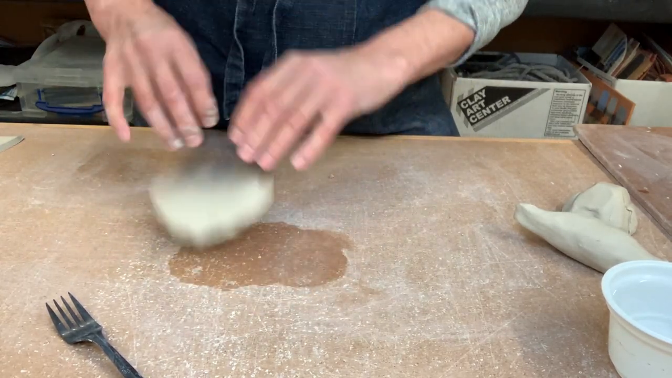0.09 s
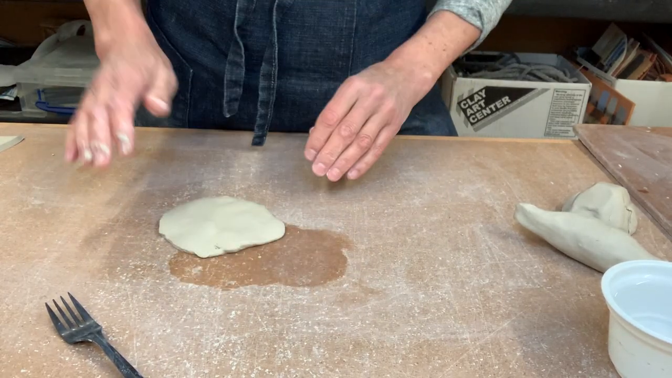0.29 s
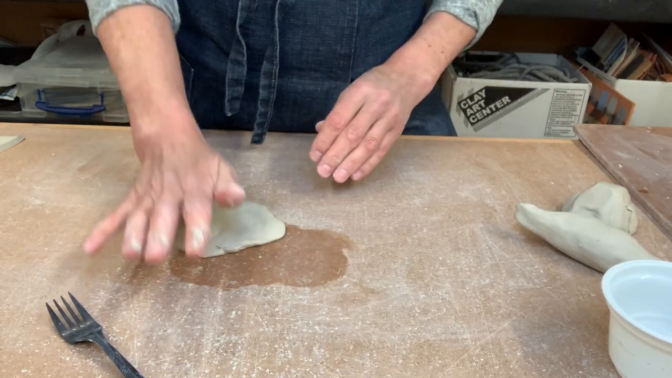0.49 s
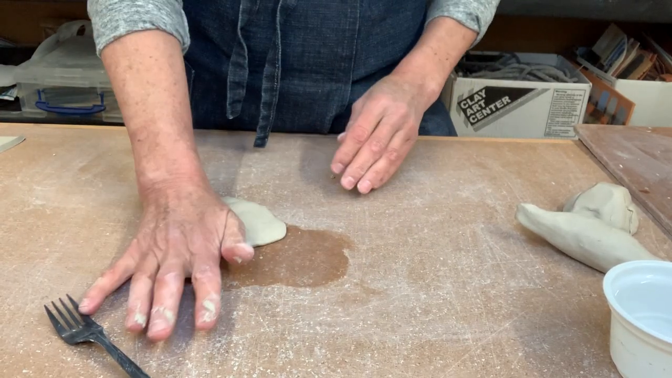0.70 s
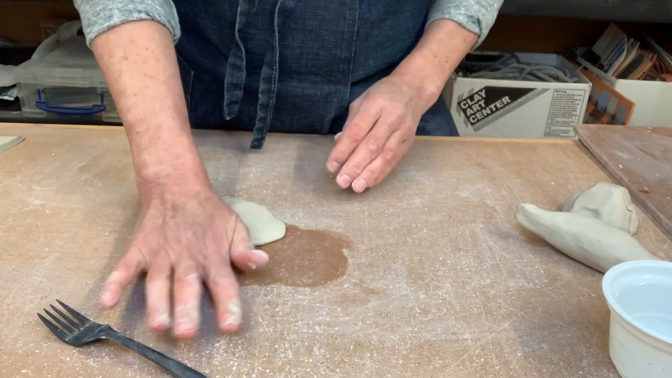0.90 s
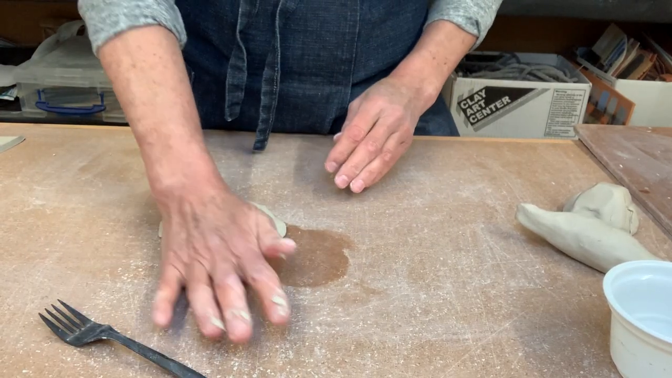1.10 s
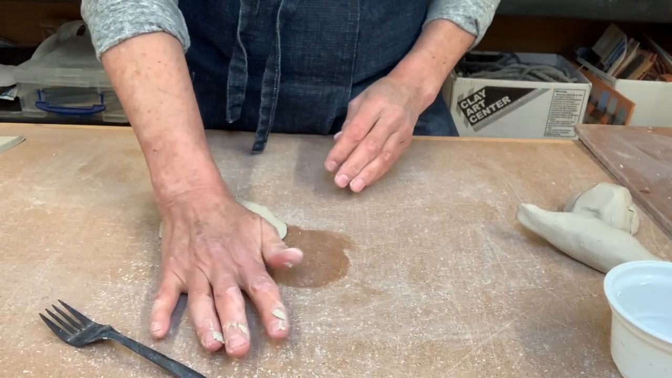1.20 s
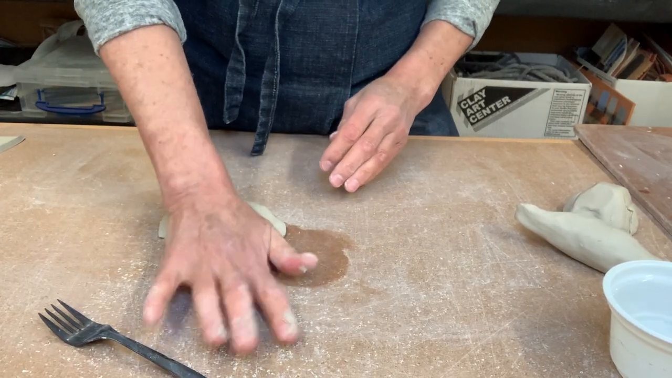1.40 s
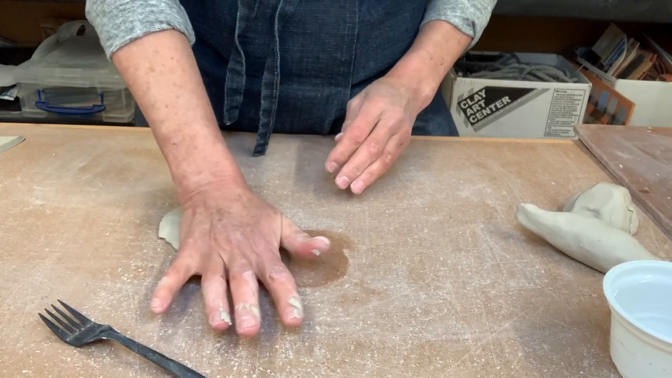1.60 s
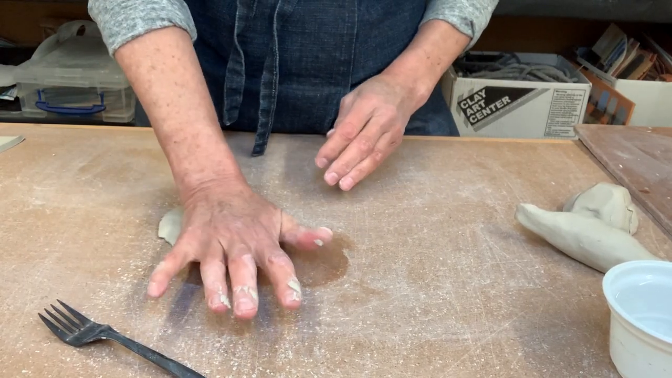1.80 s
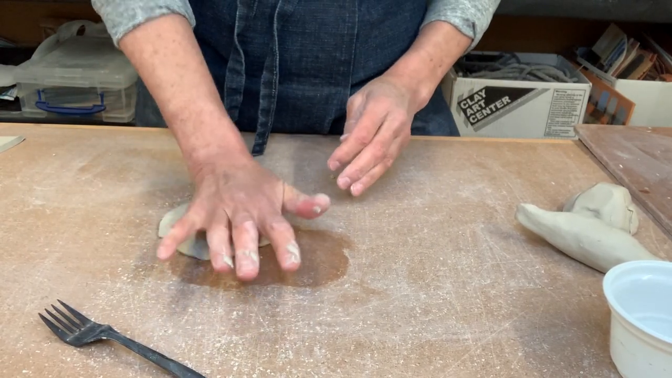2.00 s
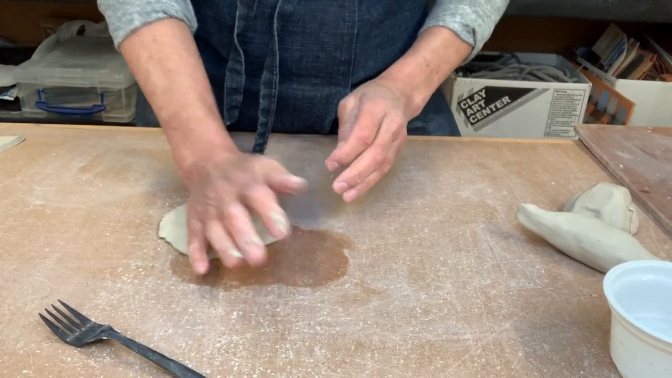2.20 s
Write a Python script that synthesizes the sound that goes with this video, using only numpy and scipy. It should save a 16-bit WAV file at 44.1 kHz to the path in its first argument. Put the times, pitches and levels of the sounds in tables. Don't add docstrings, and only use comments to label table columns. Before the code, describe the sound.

A bare palm slaps moist clay on a wooden table, then sticky skin peels off with ticks

```python
import sys
import numpy as np
from scipy import signal
from scipy.fft import rfft, irfft, next_fast_len
from scipy.io import wavfile
from scipy.ndimage import uniform_filter1d

SR = 44100
rng = np.random.default_rng(int(sys.argv[2]) if len(sys.argv) > 2 else 0)


def natural_amplitude(level_db):
    exponent = np.asarray(level_db, float) / 20
    return 10 ** exponent


def int16_out(signal):
    q = np.round(np.clip(np.atleast_2d(signal).T, -1, 1) * 32767)
    wavfile.write(sys.argv[1], SR, q.astype(np.int16))


N = 97020
M = next_fast_len(N + SR // 4)
F = np.arange(M // 2 + 1) * SR / M + 1e-9
T = np.arange(N) / SR
SLAP_S = 0.2052
NOTCH_HZ = 8490


def curve(points):
    p = np.array(points, float)
    return np.interp(np.log(F), np.log(np.maximum(p[:, 0], 1)), p[:, 1])


def shape(x, response):
    return irfft(rfft(x, M) * response, M)[..., :N]


def above(hz):
    return (1j * F / (1j * F + hz)) ** 2


def delay(seconds):
    return np.exp(-2j * np.pi * F * seconds)


def decay(t, t60):
    return np.exp(-np.log(1000) * t / t60)


def unit(x):
    return x / np.sqrt(np.mean(x ** 2))


def bump(at, rise, fall):
    return np.exp(np.where(T < at, (T - at) / rise, (at - T) / fall))


def walk(rate):
    k = int(SR / rate)
    return unit(uniform_filter1d(uniform_filter1d(rng.standard_normal(N), k), k))


def ring(tones_hz, modes, at, scatter_db, count):
    out = np.zeros(N + count)
    start = int(at * SR)
    luck = rng.standard_normal(len(modes))
    t = np.maximum((np.arange(count) + start) / SR - at, 0)
    for hz, (db, t60), a in zip(tones_hz, modes, luck):
        out[start:start + count] += natural_amplitude(db + scatter_db * a) * decay(t, t60) * np.sin(2 * np.pi * hz * t)
    return out[:N]


# f/Hz, level/dB
HUM_TONE = [(25, -13.5), (50, 1), (115, 0), (165, -14), (300, -14), (450, -28.5), (4000, -42), (14000, -45)]
# f/Hz, level/dB
DRONES = [(120, -80.5), (417, -89)]
HUM_DB = -64.5


def hum():
    noise = shape(rng.standard_normal((2, N)), natural_amplitude(curve(HUM_TONE)))
    low = 1 / (1 + (F / 400) ** 2)
    rumble = shape(noise[0], low) * natural_amplitude(0.83 * walk(6.3))
    hiss = shape(noise[0], 1 - low) * natural_amplitude(0.84 * walk(11))
    side = shape(noise[1], np.clip(F / 500, 0.1, 1))
    drones = sum(natural_amplitude(db + 2 * walk(6)) * np.sin(2 * np.pi * hz * T + 1.7 * walk(3.6)) for hz, db in DRONES)
    return natural_amplitude(HUM_DB) * unit(rumble + hiss + side * np.array([[1], [-1]])) + drones


# f/Hz, t60/s, late level/dB
ROOM_BANDS = [(245, 0.16, -2.5), (520, 0.2, -14), (1000, 0.25, -7), (2000, 0.26, 0.53), (4170, 0.33, 1),
              (7987, 0.25, -9), (14000, 0.21, -12)]
# f/Hz, level/dB
ROOM_TINT = [(200, -1.5), (500, -0.5), (1000, -1), (1800, -3), (2500, 0.6), (3400, -3), (5000, -4),
             (12000, -7.5)]
ROOM_DB, LATE_DB, LATE_T60_S, ROOM_GAP_S = -10, -36, 1, 0.0019


def room():
    out = 0
    for hz, t60, late_db in ROOM_BANDS:
        band = shape(rng.standard_normal((2, N)), np.exp(-(np.log2(F / hz) / 0.62) ** 2))
        late = natural_amplitude(LATE_DB + late_db - ROOM_DB) * decay(T, LATE_T60_S)
        out = out + band * (decay(T, t60) + late)
    out = out * np.clip(T / ROOM_GAP_S - 1, 0, 1)
    return natural_amplitude(ROOM_DB + curve(ROOM_TINT)) * rfft(out / np.sqrt(np.sum(out ** 2) / 2), M)


# t/s, level/dB, rise/s, fall/s, tilt/(dB per
PATS = [(.795, -64, .004, 0.035, -0.5), (0.899, -80.5, 0.08, 0.017, -4), (1.23, -74, .02, 0.026, -0.5),
        (1.29, -74.5, 0.026, 0.041, -1), (1.476, -60.5, 0.012, 0.0077, 1.4), (1.515, -76, 0.022, 0.022, -3),
        (1.657, -66, .002, .004, -0.6), (1.659, -62, 0.0019, 0.009, -9),
        (1.927, -61.5, 0.0136, 0.009, -0.4), (2.06, -80, 0.031, 0.034, 0),
        (2.1105, -41, 0.0006, 0.002, -4.5), (2.116, -59, .005, 0.017, -4.5), (2.2, -57, 0.0026, .004, -6)]
# f/Hz, level/dB
PAT_TONE = [(160, -16), (450, -4.5), (1970, -9), (3580, -13), (6410, -15), (13800, -26.5), (16000, -46)]


def pats():
    out = 0
    octaves = np.log2(np.maximum(F, 500) / 2000)
    for at, db, rise, fall, tilt_db in PATS:
        grit = rng.standard_normal(N) * natural_amplitude(2.3 * walk(600))
        brush = unit(shape(grit, natural_amplitude(curve(PAT_TONE) + tilt_db * octaves)))
        out = out + natural_amplitude(db) * bump(at, rise, fall) * brush
    return out


# f/Hz, level/dB
PEEL_TONE = [(400, 6), (1300, 18), (3300, 8.5), (4600, -13), (5500, 13), (7000, -1), (10600, -7),
             (15000, -12)]
PEEL_FROM_S, PEEL_TO_S, PEEL_RISE_S, PEEL_FADE_S = 0.925, 1.039, 0.0094, 0.013
PEEL_DB, GRAINS_PER_S = -57, 6000


def crackle():
    chance, size = rng.random((2, N))
    grains = (chance < GRAINS_PER_S / SR) * natural_amplitude(-1.5 * np.log(size + 1e-9)) * rng.standard_normal(N)
    rise = np.clip((T - PEEL_FROM_S) / PEEL_RISE_S, 0, 1)
    fade = np.exp(-np.maximum(T - PEEL_TO_S, 0) / PEEL_FADE_S)
    return natural_amplitude(PEEL_DB) * rise * fade * unit(shape(grains, natural_amplitude(curve(PEEL_TONE))))


# t/s, level/dB, treble level/dB, pitch ratio
TICKS = [(.786, -41, -5, 1.03), (0.889, -61, -26, .95), (.915, -75, -26, 0.84), (.933, -50, -26, 0.87),
         (0.9406, -26.5, 0, 1.055), (0.958, -48, -14.5, 0.68), (.964, -56, -12, 0.99),
         (0.9965, -31, 3.5, 0.987), (1.027, -37.5, -12, .97), (1.045, -46, -16, 0.84),
         (1.057, -55, -21, 0.42)]
TICK_LOW_HZ = [1100, 1420, 2400, 3650, 5300, 1750, 3150, 6100]
# level/dB, t60/s
TICK_LOW = [(-9.5, 0.022), (-2.5, 0.011), (-14, 0.0061), (-4, 0.0089), (-8, 0.0058), (-5, 0.013),
            (0.7, 0.0066), (-11.5, 0.0039)]
TICK_HIGH_HZ = [7300, 10500, 13500, 9400, 14800]
# level/dB, t60/s
TICK_HIGH = [(-6, 0.0038), (6.5, 0.0029), (-8.5, 0.005), (-5, 0.0039), (-12.5, 0.0036)]
DULL_HZ, TICK_CUT_HZ = 2000, 610


def ticks():
    out = 0
    for at, db, treble_db, ratio in TICKS:
        modes = [(g + 0.3 * treble_db * (hz > DULL_HZ), t60) for hz, (g, t60) in zip(TICK_LOW_HZ, TICK_LOW)]
        bubbles = ring(np.multiply(TICK_LOW_HZ, ratio), modes, at, 1.0, count=900)
        skin = ring(TICK_HIGH_HZ, TICK_HIGH, at, 3.7, count=900)
        out = out + natural_amplitude(db) * (bubbles + natural_amplitude(treble_db) * skin)
    return shape(out, above(TICK_CUT_HZ))


# f/Hz, level/dB
SNAP_TONE = [(300, 8), (1300, 18), (2400, 12.5), (3400, 19.5), (6000, 2), (10500, 16.5), (15000, 9)]


def snaps():
    return sum(natural_amplitude(db) * delay(at) for at, db, *_ in TICKS) * natural_amplitude(curve(SNAP_TONE))


# t/s, level/dB, contact/s
PUSHES = [(.206, -18.5, 0.002), (0.263, -25, 0.0046), (0.291, -30, .004), (.365, -37.5, 0.0054),
          (0.419, -51, .012), (0.457, -50, 0.0039), (0.489, -52, 0.0049), (0.529, -53, .006),
          (.755, -47, 0.012), (0.942, -53, 0.00185), (1.211, -46, 0.008), (1.385, -54, 0.014),
          (1.481, -50.5, 0.0038), (1.66, -44, 0.008), (1.869, -51.5, 0.0061), (1.924, -56, 0.0035),
          (2.112, -42, 0.003)]
TABLE_HZ = [51, 58, 86, 96, 112, 128, 160, 190, 217, 255, 340]
# level/dB, t60/s
TABLE_MODES = [(-11, 0.39), (-3, 0.17), (-9.5, 0.34), (0.5, 0.17), (4, 0.077), (-3, 0.22), (0, 0.096),
               (-3, .1), (0.5, 0.17), (-2.5, 0.13), (-20.5, 0.15)]
# t/s, level/dB, contact/s
LEANS = [
    (1.213, -44, .014),
    (1.664, -39, .014),
    (2.116, -21, .014),
]
LEGS_HZ = [55, 61, 75]
# level/dB, t60/s
LEGS_MODES = [(-1.5, .38), (-5, .25), (-9, .1)]


def pushed(pushes, tones_hz, modes):
    force = sum(natural_amplitude(db) * np.sin(np.pi * np.clip((T - at) / contact, 0, 1)) / (contact * SR)
                for at, db, contact in pushes)
    return shape(force, rfft(ring(tones_hz, modes, 0, 0, count=20000), M))


def table():
    return pushed(PUSHES, TABLE_HZ, TABLE_MODES) + pushed(LEANS, LEGS_HZ, LEGS_MODES)


# f/Hz, level/dB
CLAP_TONE = [(200, 0), (600, 3), (2000, -3), (4000, -8), (7000, -10), (11000, -8.5), (15000, -12.5)]
CLAP_DB = 24


def clap():
    return natural_amplitude(CLAP_DB + curve(CLAP_TONE)) * delay(SLAP_S)


PALM_HZ = [507, 800, 1235, 1810, 2500, 3500, 4400, 6030, 10650, 2800, 5630, 11540, 12560, 14060]
# level/dB, t60/s
PALM_MODES = [(0, 0.02), (1.5, 0.016), (-10.5, 0.024), (-4.5, 0.023), (-13.5, 0.0052), (-12.5, 0.01),
              (-13.5, 0.018), (-15, 0.009), (-4, 0.01), (-16.5, 0.011), (-17, 0.0072), (-9, .007),
              (-20, 0.0072), (-7, .004)]
# t/s after the palm, level/dB
FINGERS = [
    (-.0013, -10),
    (-.0004, -9.5),
    (.0003, -3),
    (.0011, -6),
    (.0022, -12),
]
SLAP_DB, CRACK_DB, CRACK_RISE_S, CRACK_FALL_S = -5.5, -13.5, 0.0011, 0.0016
PALM_CUT_HZ = 370


def slap():
    fingers = sum(natural_amplitude(db) * ring(PALM_HZ[4:], PALM_MODES[4:], SLAP_S + s, 4.0, count=1500)
                  for s, db in FINGERS)
    pocket = shape(ring(PALM_HZ[:4], PALM_MODES[:4], SLAP_S, 0, count=3000), above(PALM_CUT_HZ))
    air = rng.standard_normal(N) * bump(SLAP_S, CRACK_RISE_S, CRACK_FALL_S)
    crack = shape(air, F / (F + 3000))
    return natural_amplitude(CRACK_DB) * crack + natural_amplitude(SLAP_DB) * (pocket + fingers)


LAG_S, LAG_POWER = 0.0023, 0.72


def bass_lag():
    khz = np.maximum(F, 30) / 1000
    lag = LAG_S * (khz ** -LAG_POWER - 10 ** -LAG_POWER)
    return np.exp(-2j * np.pi * np.cumsum(lag) * SR / M)


# f/Hz, level/dB
PORT_DB = [(60, 1.16), (110, 0.5), (200, 0.5), (380, -0.5), (700, 7.5), (1290, 6), (2380, 2), (4400, 1),
           (8120, -0.5), (15000, 1)]
# f/Hz, phase/rad
PORT_RAD = [(60, 0.088), (250, .5), (780, 2.2), (1290, 1.2), (3100, 2.1), (4300, 0.95), (7240, 2.7),
            (14000, 1.1)]


def two_ports():
    port = natural_amplitude(curve(PORT_DB) / 2) * np.exp(0.5j * curve(PORT_RAD))
    return np.array([port, 1 / port])


DIFFUSE_NOTCH_DB, DIFFUSE_NOTCH_WIDTH_HZ, DIFFUSE_TOP_HZ = -26, 620, 15200


def surround(diffuse):
    common = diffuse.mean(axis=0)
    notch = natural_amplitude(DIFFUSE_NOTCH_DB * np.exp(-((F - NOTCH_HZ) / DIFFUSE_NOTCH_WIDTH_HZ) ** 4))
    return diffuse - common + shape(common, notch / (1 + (F / DIFFUSE_TOP_HZ) ** 40))


def scene():
    lifting = crackle()
    soft = pats()
    late, ports = bass_lag(), two_ports()
    walls = snaps() + rfft(lifting, M) + rfft(soft, M) + clap()
    echoes = irfft(walls * late * room() * abs(ports), M)[:, :N]
    direct = ticks() + lifting + soft + slap() + table()
    return shape(direct, late * ports) + surround(echoes + hum())


def top_cut(x):
    return signal.sosfilt(signal.butter(12, 16840, fs=SR, output="sos"), x)


NOTCH_WIDTH_HZ, NOTCH_DB = 760, -4
BASS_CUT_HZ, TOP_HZ = 44, 14800


def record(dry):
    notch = natural_amplitude(NOTCH_DB * np.exp(-((F - NOTCH_HZ) / NOTCH_WIDTH_HZ) ** 2))
    ends = 1 / (1 + (BASS_CUT_HZ / F) ** 6) / (1 + (F / TOP_HZ) ** 16)
    mix = shape(dry, notch * ends)
    return top_cut(mix)


dry = scene()
out = record(dry)
int16_out(out)
```